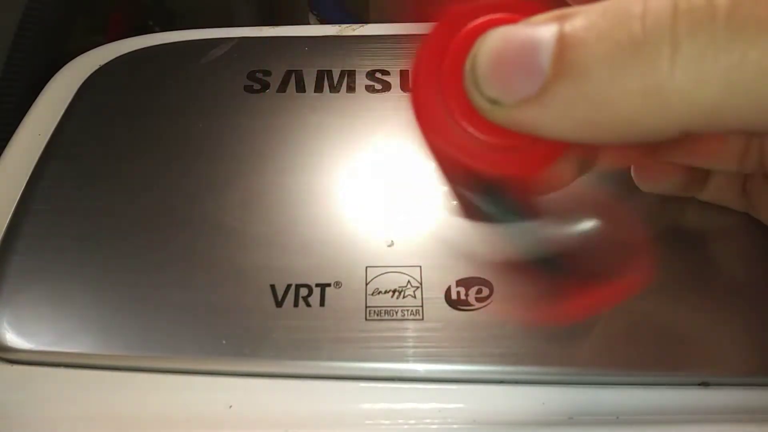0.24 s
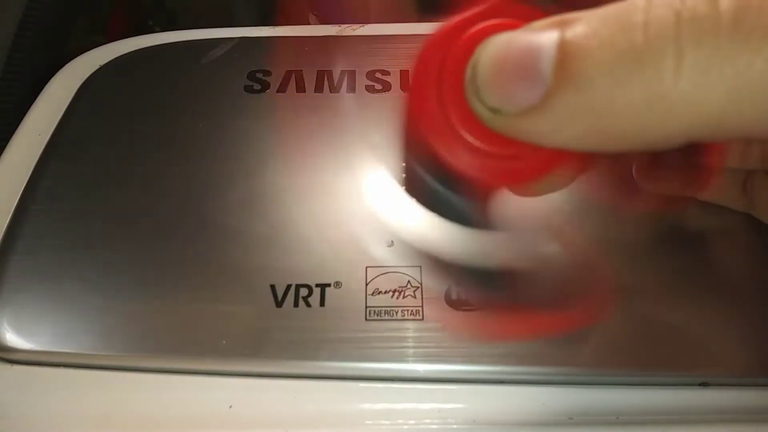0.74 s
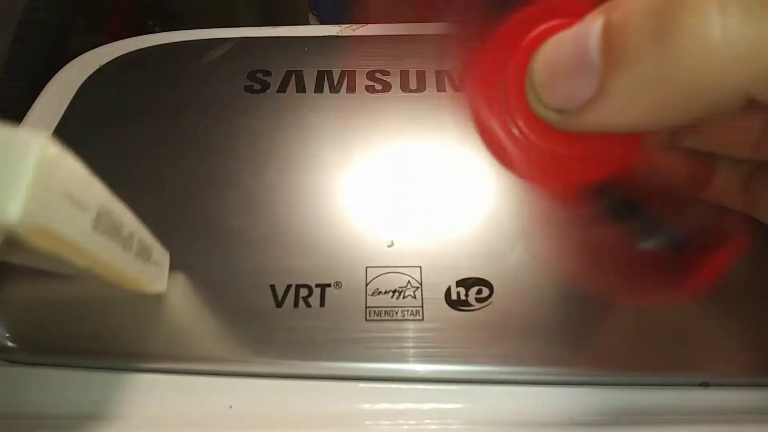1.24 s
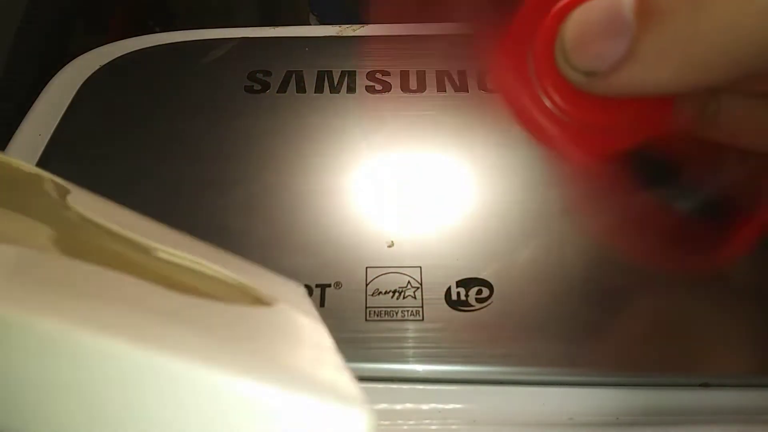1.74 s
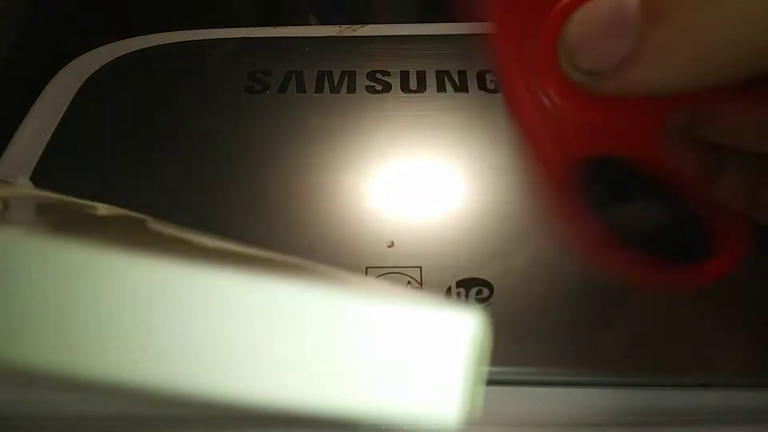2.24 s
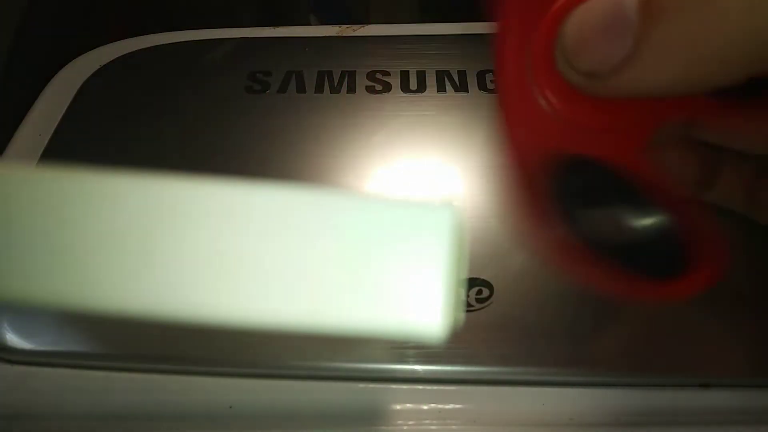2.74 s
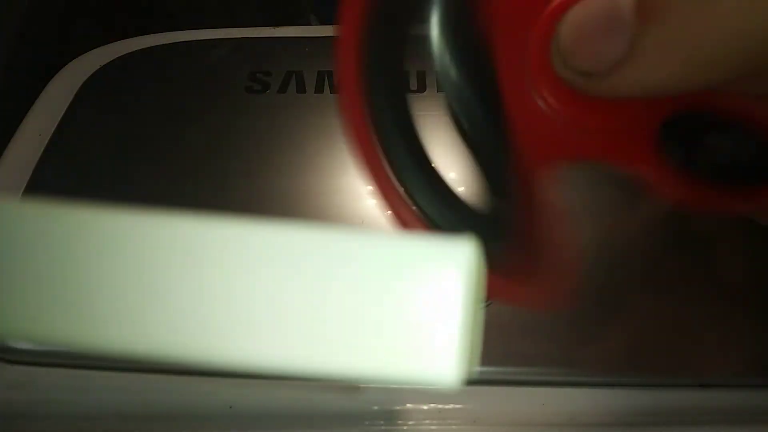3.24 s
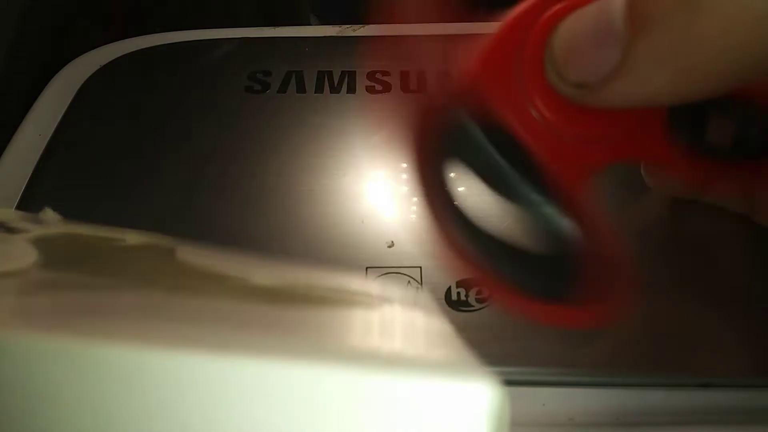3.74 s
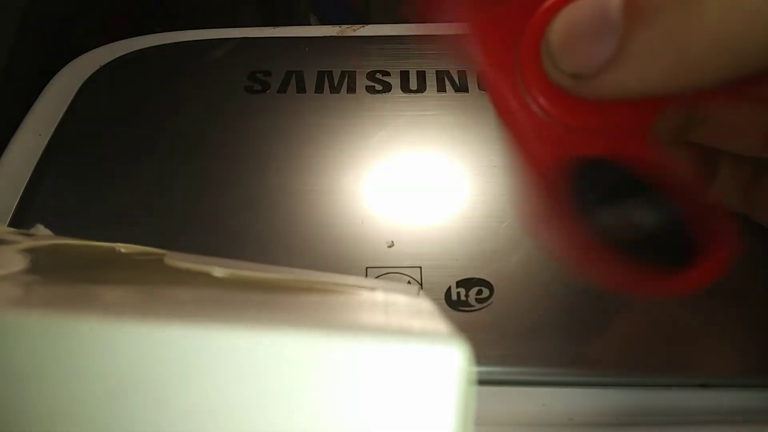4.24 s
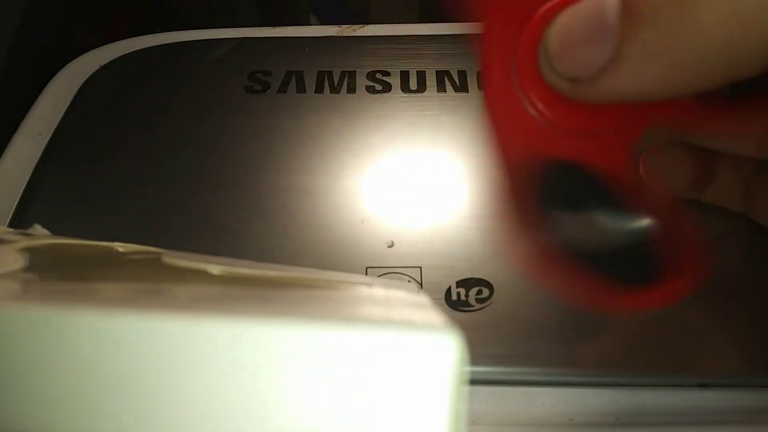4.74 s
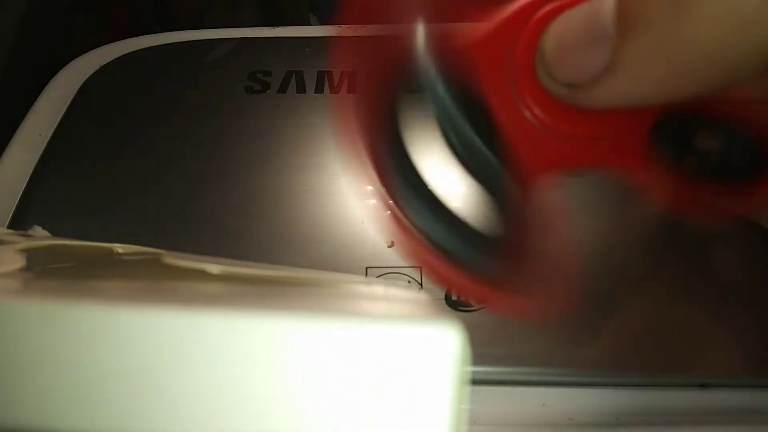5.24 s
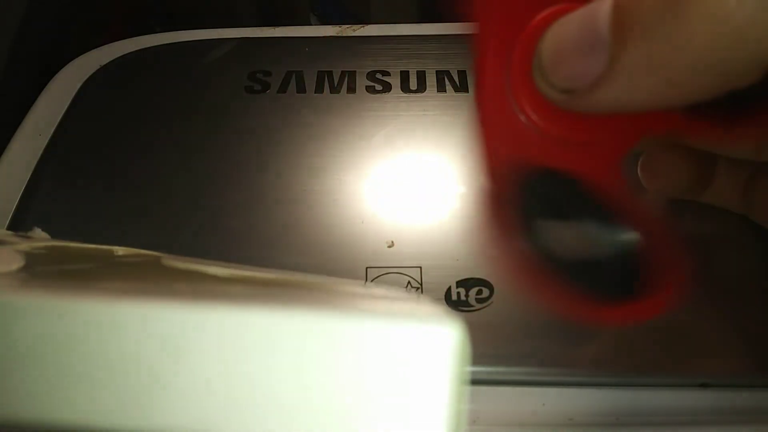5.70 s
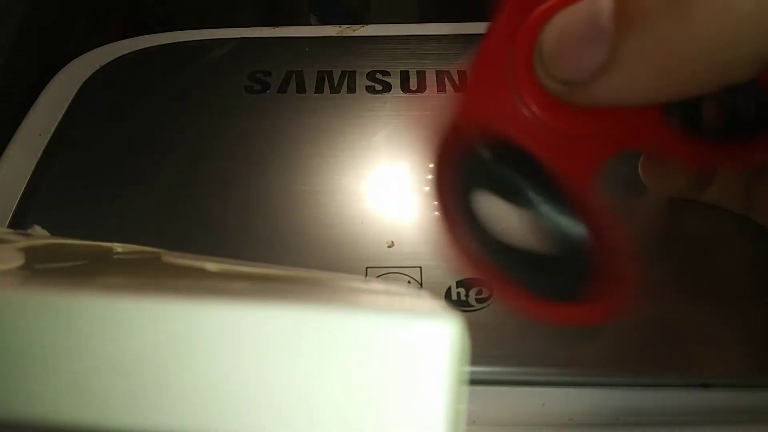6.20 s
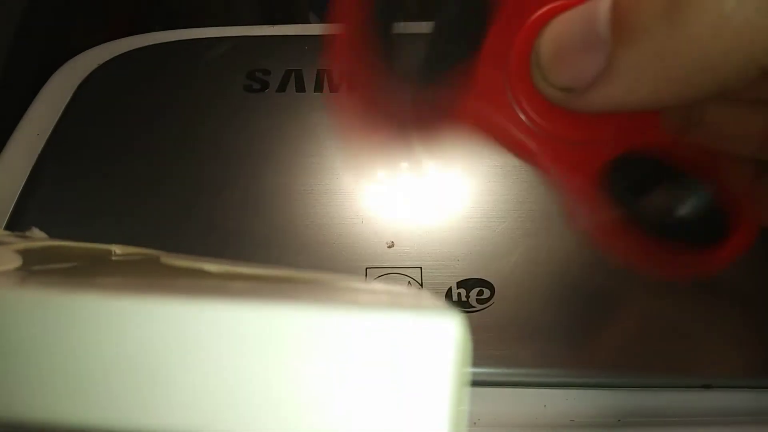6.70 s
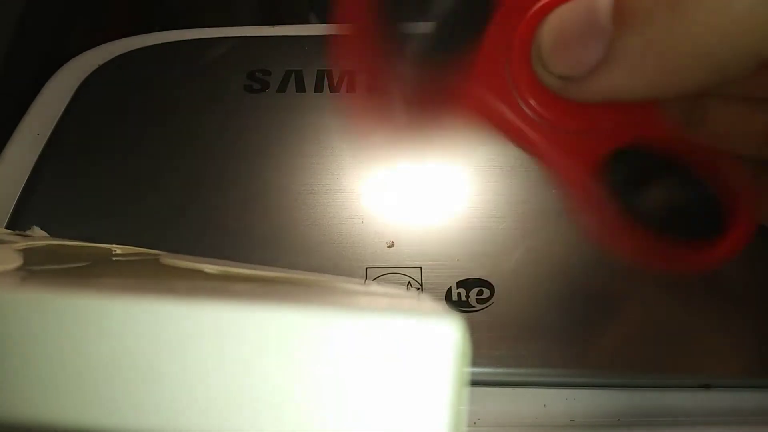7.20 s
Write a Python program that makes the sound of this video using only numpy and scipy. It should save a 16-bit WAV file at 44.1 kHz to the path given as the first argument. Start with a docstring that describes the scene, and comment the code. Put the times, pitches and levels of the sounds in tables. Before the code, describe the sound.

Very close to a phone microphone in a small hard room, a fidget spinner whirrs thinly while fingers rustle on a plastic block. Light taps lead to three very loud clacks just after two seconds, then a long rapid rattle around three and a half, and two shorter, weaker rattles later. Each train slows slightly; the whirr fades between them.

```python
"""A thin bearing whirr and the rustle of a hand come first: a hand spinner runs down in a small hard room while
a hollow plastic block is brought up. After light taps, the lobes rattle four times against the block's edge in
slowing trains of sharp clacks. Clacks are noise chatter through block modes, a hollow thud and room echoes; the
whirr is gritty noise through race modes; rustle, rumble and hiss are coloured noise; faint sine tones come and go.
A phone held close suppresses noise, limits and clips."""
import sys
import numpy as np
from scipy import signal
from scipy.fft import rfft, irfft, next_fast_len
from scipy.io import wavfile
from scipy.ndimage import uniform_filter1d, minimum_filter1d, map_coordinates

SR = 44100
rng = np.random.default_rng(int(sys.argv[2]) if len(sys.argv) > 2 else 0)


def master_out(mix):
    """Clip the mix to full scale and print it as 16-bit PCM to the path in sys.argv[1]."""
    frames = np.transpose(np.atleast_2d(mix))
    ceiling = np.clip(frames, -1, 1)
    pcm = np.round(ceiling * 32767).astype(np.int16)
    wavfile.write(sys.argv[1], SR, pcm)


N = 328986
BLOW_SAMPLES = 4096

# resonances of the plastic block: pitch_hz [Hz], width_hz [Hz], level_db [dB, relative]
BLOCK_MODES = [(743, 10, -12.5), (944, 130, -7), (1378, 110, 1.5), (1744, 67, -3.5), (2080, 180, -8),
               (2680, 120, -11), (3554, 320, -6), (4216, 67, -2.5), (5265, 560, -5), (6390, 690, -4.5),
               (7530, 1100, -9.5), (9000, 820, -14.5), (10900, 33, -29.5), (15600, 500, -22.5)]


def amp(db):
    """dB to gain."""
    return 10 ** (np.asarray(db) / 20)


def unit(x):
    """Scaled to rms 1."""
    return x / np.sqrt(np.mean(x ** 2) + 1e-20)


def along(points, hz):
    """(Hz, value) points read on a log frequency axis."""
    f, v = np.transpose(points)
    return np.interp(np.log(hz + 1), np.log(f + 1), v)


def curves(rows, t):
    """Each column after the time, read at times t."""
    s, *cols = np.transpose(rows)
    return [np.interp(t, s, c) for c in cols]


def wobble(rate):
    """A smooth random curve, rate knots a second."""
    knots = rng.standard_normal(int(N * rate / SR) + 4)
    return map_coordinates(knots, [np.arange(N) * rate / SR])


def filtered(x, response):
    """x times a complex response of frequency."""
    m = next_fast_len(len(x) + 8192)
    return irfft(rfft(x, m) * response(np.fft.rfftfreq(m, 1 / SR)), m)[:len(x)]


def causal(gain):
    """The minimum-phase response with this gain, by folding the cepstrum."""
    cepstrum = irfft(np.log(np.maximum(gain, 1e-6)))
    half = len(cepstrum) // 2
    cepstrum[1:half] *= 2
    cepstrum[half + 1:] = 0
    return np.exp(rfft(cepstrum))


def modes(table, f):
    """Sum of resonances with alternating sign."""
    return sum((-1) ** k * amp(db) * 1j * f * width / (centre * centre - f * f + 1j * f * width)
               for k, (centre, width, db) in enumerate(table))


def noise(spectrum):
    """Coloured noise of rms 1."""
    return unit(filtered(rng.standard_normal(N), lambda hz: amp(along(spectrum, hz))))


def patchy(x, depth_db, tall, long):
    """Random gain patches, tall bands high and long frames long."""
    z = signal.stft(x, nperseg=512)[2]
    field = uniform_filter1d(rng.standard_normal(z.shape), size=tall, axis=0)
    field = uniform_filter1d(field, size=long, axis=1)
    return signal.istft(z * amp(depth_db * unit(field)), nperseg=512)[1][:N]


def clacks():
    """Each lobe strikes once, then chatters along the edge; block, hollow air and walls answer every blow."""
    reach_m = .22  # block to phone
    out, t = np.zeros(N + SR), np.arange(BLOW_SAMPLES) / SR
    hz = np.fft.rfftfreq(BLOW_SAMPLES, 1 / SR)
    strike = causal(1.23 * amp(along([(8000, 6.7), (13000, 0)], hz)))  # first contact, weaker at the top
    habit, bumps_db = rng.standard_normal(BLOW_SAMPLES), 4 * rng.standard_normal(BLOW_SAMPLES)
    for s, db, treble_db, thud_db, body_db, panel_db, t60 in blows():
        push = 2.4 * chatter(t, habit, bumps_db, t60) + strike
        body = block_response(hz, db, treble_db, body_db, panel_db)
        blow = irfft(push * body * bending_lag(hz))
        blow *= amp(db + 3.0) / np.abs(blow).max()
        thud = hollow_thud(t, db + thud_db - 2.5)
        # the room is fed the smooth block colour at the blow's energy, plus the thud
        smooth = irfft(body)
        smooth *= np.linalg.norm(blow) / np.linalg.norm(smooth)
        wet = signal.fftconvolve(thud + smooth, room_tail())
        wet[:BLOW_SAMPLES] += blow + thud
        at = round((s + reach_m / 343) * SR)
        out[at:at + len(wet)] += wet
        # a short noise swells for 250 samples before each blow
        swell = unit(irfft(rfft(rng.standard_normal(BLOW_SAMPLES)) * body))[:250]
        out[at - 250:at] += amp(min(db, 0) - 27.5) * swell * np.linspace(0, 1, 250) ** 2
    return out[:N]


def blows():
    """Contacts as (start_s, peak_db, treble_db, thud_db, body_db, panel_db, chatter_t60_s), dB before fixed offsets."""
    # light touches while the block comes near: start_s [s], peak_db, treble_db, body_db, panel_db
    # [dB, before the offsets inside a blow], chatter_t60_s [s]
    taps = [(0.936, -37, -16, -15, -14, 0.057), (1.173, -21.5, -11, -29.5, -11, 0.013),
            (1.282, -33.5, -22.5, -32.5, -9, 0.026), (1.696, -11, -7.5, -40, -2, 0.007),
            (1.925, -34, -15.5, -36, -9.5, 0.037), (1.958, -25.5, 3, -39.5, -20.5, 0.037),
            (2.033, -33, -21.5, -23.5, -6.5, .038), (2.067, -38, -18, -23, -8.5, .039),
            (2.129, -24, -12.5, -20, 1.5, 0.013)]
    # the block is pressed into the lobes and every blow slows them: first_s [s], first_gap_s [s],
    # gap_growth_s [s per gap], treble_db, body_db, thud_db [dB, before the offsets inside a blow],
    # chatter_t60_s [s], list of peak_db [dB, likewise]
    trains = [(2.1682, .0506, .002, -7, -23, -35, .028, [5, 8.5, 5.5]),
              (3.5669, .0274, .00033, -12, -23, -47, .045, [-3.5, 1, 6.5, 5, 6, 4, 4, 1, 2, 3, 2.5, .5, .5, -1.5]),
              (5.6036, .0318, .00065, -12.5, -19, -43, .023, [-10, -3.5, -4, -1.5, -1, -7, -20]),
              (6.5165, .0332, .00065, -12, -18, -35, .026, [-11, -3.5, -1, -.5, -1])]
    tap_thud_db, first_panel_db = -44.5, -12.5  # before the offsets inside a blow
    panel_damps_db, thud_builds_db = 2.53, 1.71  # per blow, as the hand presses on
    chatter_shrinks = 0.92  # t60 factor per blow
    rows = [(s, db, treble_db, tap_thud_db, body_db, panel_db, t60)
            for s, db, treble_db, body_db, panel_db, t60 in taps]
    for first, gap, longer, treble_db, body_db, thud_db, t60, peaks_db in trains:
        for k, db in enumerate(peaks_db):
            s = first + k * gap + longer * k * (k - 1) / 2
            rows.append((s, db, treble_db, thud_db + thud_builds_db * k, body_db,
                         first_panel_db - panel_damps_db * k, t60 * chatter_shrinks ** k))
    return rows


def chatter(t, habit, bumps_db, t60):
    """Spectrum of decaying contact noise, part repeated at every blow as lobe and edge keep their shape."""
    new_part = 0.73  # against 1 of the repeating part
    contact = habit + new_part * rng.standard_normal(BLOW_SAMPLES)
    spectrum = rfft(contact * amp(-60 * t / max(t60, .004) + bumps_db))
    # hard contacts: an even, white push
    power = uniform_filter1d(np.abs(spectrum) ** 2, size=29)
    return spectrum * causal(1 / np.sqrt(power))


def block_response(hz, db, treble_db, body_db, panel_db):
    """Block modes at slightly new strengths, the panel mode and a broad crack, tilted by the blow."""
    # broad colour of a blow: pitch_hz [Hz], level_db [dB per Hz, relative]
    crack = [(71, -60), (120, -22.5), (232, -15), (330, -20.5), (410, -27), (520, -8), (720, -3),
             (1210, -11.5), (1390, -14), (2100, -1), (2980, -4.5), (5540, 10), (10100, -30), (15500, -38.5),
             (16500, -38)]
    # the face next to the struck edge: pitch_hz [Hz], width_hz [Hz], level_db [dB, relative]
    panel_mode = (2250, 250, 0)
    soft_dulls = 0.1  # dB lost at the top per dB that a blow is weak
    ring = [(centre, width, level + rng.normal(0, 1.4)) for centre, width, level in BLOCK_MODES]
    panel = amp(panel_db + 9.5) * np.abs(modes([panel_mode], hz))
    tilt_db = along([(100, body_db + 6), (350, body_db + 24.0), (900, body_db + 17.5),
                     (1800, 0.0049), (3500, 0.011), (5000, treble_db + 3.0), (7000, treble_db + 4.5),
                     (11000, treble_db + 2.5 + soft_dulls * min(db, 0))], hz)
    colour = np.abs(modes(ring, hz)) + panel + 0.48 * amp(along(crack, hz))
    return causal(amp(tilt_db) * colour)


def bending_lag(hz):
    """Low bending waves cross the block slowly, so the bottom of a blow arrives late."""
    lag_s, lag_hz = .03, 200  # delay at the bottom; a quarter of it at this pitch
    return np.exp(2j * np.pi * lag_s * lag_hz * (lag_hz / (hz + lag_hz) - 1))


def hollow_thud(t, level_db):
    """The air inside the block: a decaying sine, its pitch shifted by the grip from blow to blow."""
    hollow_hz, spread, decay_db_per_s = 236, .15, 680  # spread in natural log of pitch
    hz = hollow_hz * np.exp(rng.normal(0, spread))
    fade_in = np.clip(t / .006, 0, 1)
    return amp(level_db - decay_db_per_s * t) * np.sin(2 * np.pi * hz * t) * fade_in


def room_tail():
    """First walls, then a diffuse tail in which each frequency dies at its own speed."""
    # first echoes: delay_s [s], level_db [dB]
    walls = [(.012, -33.5), (0.016, -22.5), (.024, -29.5)]
    # reverberation: pitch_hz [Hz], t60_s [s]
    decay = [(200, 1), (1000, 0.47), (3000, 0.31), (6000, 0.42), (12000, 0.61)]
    hz, t, z = signal.stft(rng.standard_normal(24000), SR, nperseg=256)
    z = z * amp(-60 * t / along(decay, hz)[:, None]) * np.clip(t / 0.0022, 0, 1)
    tail = signal.istft(z, SR, nperseg=256)[1]
    tail *= amp(-15.0) / np.linalg.norm(tail)
    for s, db in walls:  # uneven walls smear each echo over several ms
        smear = rng.standard_normal(300) * np.hanning(300)
        tail[round(s * SR):][:300] += amp(db) * smear / np.linalg.norm(smear)
    return tail


def bearing():
    """Dense uneven ball contacts with sparse harder ones ring the steel race; now and then a ball catches."""
    # whirr running down: time_s [s], level_db [dB, before the 1.7 gain]
    whirr = [(0, -59.5), (.16, -59), (.7, -60), (1.2, -61), (1.35, -59), (1.7, -59.5), (2.5, -61),
             (3.1, -62.5), (3.5, -67.5), (4.2, -69.5), (4.35, -76), (4.8, -72.5), (4.85, -70.5),
             (5.55, -73), (6.1, -74.5), (6.5, -72), (6.9, -79), (7.46, -83)]
    # modes of race and body: pitch_hz [Hz], width_hz [Hz], level_db [dB, relative]
    race_modes = [(1000, 110, -17.5), (1390, 80, -27), (2895, 80, -17.5), (3630, 190, -18), (6030, 150, -4),
                  (6330, 150, -6.5), (7160, 140, -5), (7760, 180, -2.5), (8030, 190, -2.5),
                  (8550, 380, -11), (9370, 250, -6.5), (10010, 300, -6)]
    # a ball catches in the race: start_s [s], peak_db [dB]
    ticks = [(0.24, -46), (0.4828, -39), (0.617, -44), (0.7769, -45.5), (2.7614, -47), (2.8834, -47),
             (3.0899, -40.5), (3.1218, -43.5), (3.262, -42), (4.3839, -42), (4.4387, -55), (4.613, -53.5),
             (4.8208, -50), (4.9631, -45), (5.1019, -51.5), (5.3502, -50), (5.57, -52), (6.124, -54),
             (6.3047, -51.5), (7.028, -49), (7.1554, -48)]
    # the whirr flares after a catch and calms again: dB against the catch's peak (before the 1.7 gain), s
    flare_db, flare_t60_s = -21, .25
    now = np.arange(N) / SR
    level = amp(curves(whirr, now)[0])
    for s, db in ticks:
        level += amp(db + flare_db - 60 * np.abs(now - s) / flare_t60_s) * (now > s)
    grit = rng.standard_normal(N) * amp(1.7 * wobble(420) + 0.88 * wobble(34))
    # about 70 harder contacts a second, each a short decay
    hard = np.convolve(rng.random(N) < 70 / SR, amp(-60 * np.arange(400) / 500))[:N]

    def race(f):
        return modes(race_modes, f)

    ringing = filtered(grit * (1 + .8 * hard), race)
    out = 1.7 * level * unit(patchy(ringing, 2, tall=2, long=16))
    t = np.arange(1500) / SR
    for s, db in ticks:
        tick = filtered(rng.standard_normal(1500) * amp(-60 * t / 0.007), race)
        out[round(s * SR):][:1500] += amp(db) * tick / np.abs(tick).max()
    return out


def rustle():
    """Fingers slide on the block: patchy friction noise in three colours, partly through the block modes."""
    # strokes: start_s [s], length_s [s], high_db, middle_db, low_db [dB, before the block colours them]
    strokes = [(0, 0.11, -48, -50.5, -47.5), (0.122, 0.1, -47.5, -51.5, -61.5),
               (0.366, 0.14, -53.5, -67, -73.5), (0.526, 0.16, -53.5, -67.5, -66.5),
               (0.651, 0.43, -47.5, -63, -61.5), (0.817, .1, -59, -51, -56.5),
               (0.943, 0.13, -59.5, -57, -63), (1.072, 0.083, -55, -64, -54.5),
               (1.168, 0.2, -58.5, -57, -62), (1.282, 0.11, -49.5, -53.5, -71),
               (1.507, 0.15, -51.5, -52, -60), (1.69, 0.15, -53.5, -52, -61),
               (1.846, 0.063, -46, -44.5, -54), (1.94, 0.075, -64.5, -52, -75),
               (2.054, 0.23, -53, -49, -59)]
    # colours high, middle, low, each of: pitch_hz [Hz], level_db [dB per Hz, relative]
    skin = [
        [(3000, -43.5), (4000, 1), (7000, 1), (8500, -23), (11000, -29.5), (15500, -18.5)],
        [(1100, -44.5), (1500, 4), (4000, 2), (4800, -37.5)],
        [(300, -33), (450, 4.5), (1500, 2), (1900, -37)],
    ]
    attack_s, fade_db = .02, 13.5  # rise; loss over the length of a stroke
    t = np.arange(N) / SR
    power = np.zeros((3, N))
    for s, length, *levels_db in strokes:
        rise = np.clip((t - s) / attack_s + (s == 0), 0, 1)  # a stroke at 0 is already under way
        fade = amp(-fade_db * np.clip((t - s) / length, 0, 5) ** 2)
        power += np.outer(amp(levels_db), rise * fade) ** 2
    rub = sum(gain * noise(colour) for gain, colour in zip(np.sqrt(power), skin))
    rub = filtered(rub * amp(2.1 * wobble(55)), lambda f: 0.46 + 0.44 * np.abs(modes(BLOCK_MODES, f)))
    return patchy(rub, 3.5, tall=4, long=12)


def peeps():
    """Faint narrow tones that swell and fade, wavering in level and phase."""
    # tones: middle_s [s], length_s [s], pitch_hz [Hz], level_db [dB, before the flicker]
    tones = [(0.296, 0.069, 502, -62), (0.52, .12, 2857, -69), (0.62, 0.72, 1210, -75.5),
             (0.835, 0.13, 875, -63), (0.953, 0.034, 525, -51), (1.094, 0.019, 570, -49.5),
             (1.309, .08, 206.7, -49), (1.456, .12, 2900, -69.5), (1.508, 0.024, 1380, -59.5),
             (1.64, 0.07, 1013, -63.5), (2.727, 0.072, 925, -63.5), (2.905, 0.093, 3510, -70),
             (3.065, 0.067, 310, -55.5), (3.18, 0.058, 2920, -73.5), (3.22, 0.2, 3515, -70.5),
             (3.242, 0.12, 1411, -70), (3.38, .05, 1400, -68.5), (4.755, 0.13, 990, -64),
             (4.903, 0.092, 990, -67.5), (4.579, .06, 2900, -77), (5.306, 0.054, 2900, -74),
             (6.402, 0.057, 480, -61.5), (6.991, 0.058, 995, -60.5)]
    out, t = np.zeros(N), np.arange(N) / SR
    flicker_db, waver_rad = 4 * wobble(45), 1.1 * wobble(40)
    for s, length, hz, db in tones:
        near = slice(max(0, int((s - length) * SR)), int((s + length) * SR))
        swell = amp(db + flicker_db[near]) * np.exp(-(2 * (t[near] - s) / length) ** 2)
        out[near] += swell * np.sin(2 * np.pi * hz * t[near] + waver_rad[near])
    return out


def background():
    """Low noise swells as the hand shifts on the phone, over a steady room and microphone hiss."""
    # bumps of handling rumble: middle_s [s], length_s [s], level_db [dB]
    bumps = [(0.112, 0.087, -53.5), (.29, 0.048, -57.5), (0.478, 0.046, -59.5), (1.116, .12, -43.5),
             (1.318, 0.095, -71), (1.81, 0.071, -55), (2.691, 0.11, -44), (2.812, 0.09, -61.5),
             (3.228, 0.084, -65), (3.326, 0.033, -57), (5.098, 0.11, -54), (5.227, 0.06, -58),
             (6.011, .09, -53), (6.266, 0.18, -54.5), (7.121, 0.082, -69), (7.369, 0.041, -60)]
    # colour of the rumble: pitch_hz [Hz], level_db [dB per Hz, relative]
    grip = [(12, -53.5), (20, -13), (87, 4.5), (128, -1), (184, -21), (300, -20.5), (400, -41), (520, -64),
            (880, -120)]
    # colour of the hiss: pitch_hz [Hz], level_db [dB per Hz, relative]
    air = [(88, -26.5), (150, -2), (194, -16.5), (293, -3), (409, -11.5), (488, -9), (2130, -27.5),
           (6810, -32), (7810, -24.5), (10700, -37.5), (12000, -18.5), (14000, -32.5), (15400, -25),
           (16500, -41)]
    rest_db, rest_wanders_db, air_db = -62.5, 2, -63  # rumble between the bumps, its wandering; hiss
    t = np.arange(N) / SR
    level = amp(rest_db + rest_wanders_db * wobble(26))
    for s, length, db in bumps:
        level += amp(db) * np.exp(-(2 * (t - s) / length) ** 2)
    rumble = level * unit(noise(grip) * amp(0.6 * wobble(14)))
    hiss = amp(air_db) * patchy(noise(air), 1.0, tall=2, long=20)
    return rumble + hiss


def suppress(x, margin_db, depth_db, from_hz):
    """Noise suppressor: turns down what does not rise above the median power of its band."""
    hz, _, z = signal.stft(x, SR, nperseg=512, noverlap=384)
    power = uniform_filter1d(np.abs(z) ** 2, size=2, axis=0)
    power = np.abs(uniform_filter1d(power, size=11, axis=1)) + 1e-20
    usual = np.median(power, axis=1)[:, None] * amp(2 * margin_db) * (hz[:, None] > from_hz)
    gain = np.sqrt(np.clip(1 - usual / power, 0, 1)) + amp(depth_db)
    return signal.istft(z * np.minimum(gain, 1), SR, nperseg=512, noverlap=384)[1][:N]


def limit(x, top):
    """Fast limiter: the gain dips just ahead of each peak above top."""
    need = np.minimum(1, top / (np.abs(x) + 1e-9))
    return x * uniform_filter1d(minimum_filter1d(need, size=81), size=41)


def scene():
    """All sources at the microphone."""
    return (clacks() + rustle() + bearing() + peeps() + background())[None]


def record(dry):
    """The phone suppresses noise, limits the blows, clips what still overshoots and cuts the top."""
    ceiling, headroom_db = .87, 2.5  # of full scale; what the limiter lets past it
    knee, top_hz = 13, 16200  # hardness of the clipping; band limit
    quiet = suppress(dry[0], margin_db=4.3, depth_db=-5.5, from_hz=200)
    limited = limit(quiet, ceiling * amp(headroom_db))
    clipped = limited / (1 + np.abs(limited / ceiling) ** knee) ** (1 / knee)
    return filtered(clipped, lambda hz: hz < top_hz)[None]


dry = scene()
out = record(dry)
master_out(out)
```